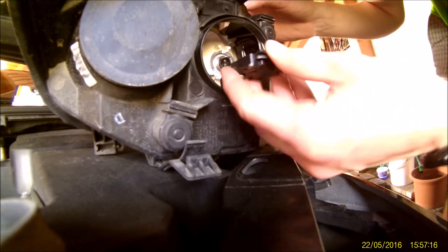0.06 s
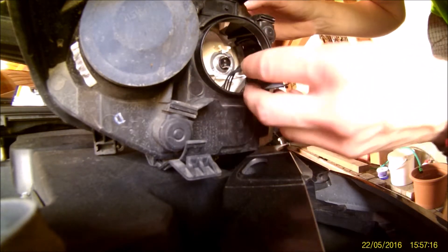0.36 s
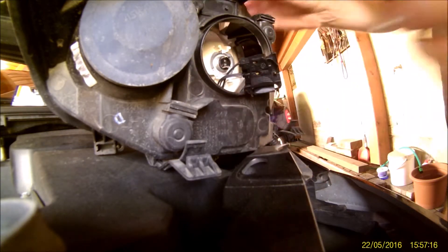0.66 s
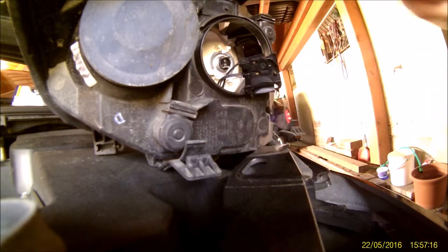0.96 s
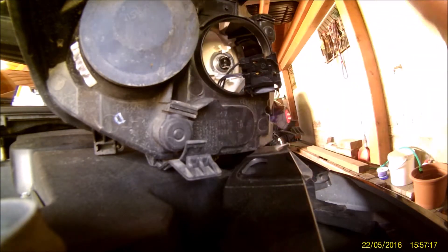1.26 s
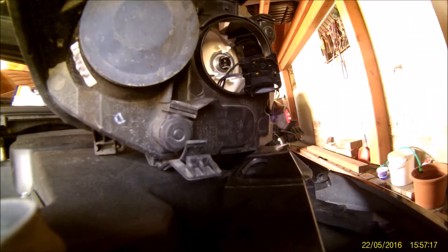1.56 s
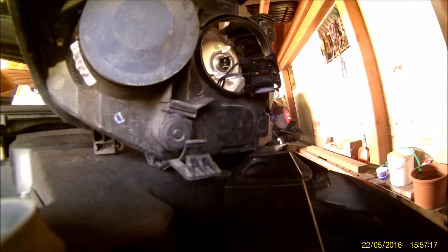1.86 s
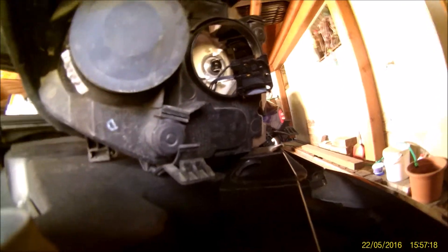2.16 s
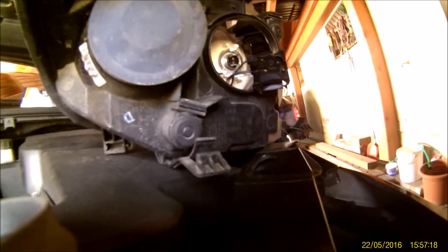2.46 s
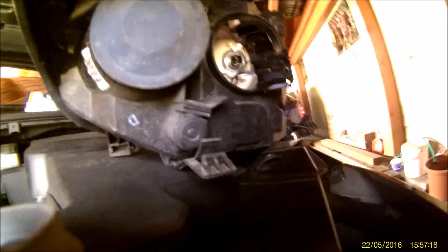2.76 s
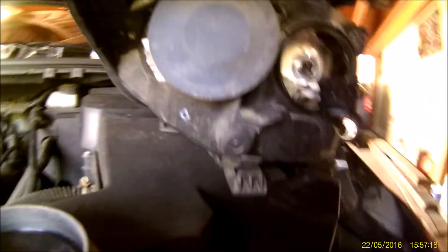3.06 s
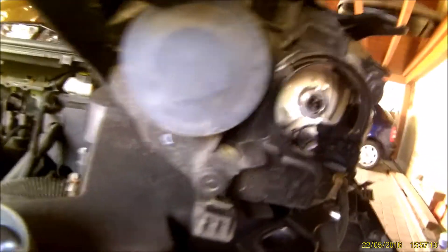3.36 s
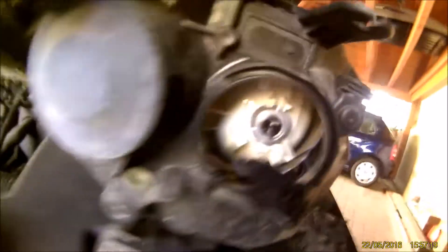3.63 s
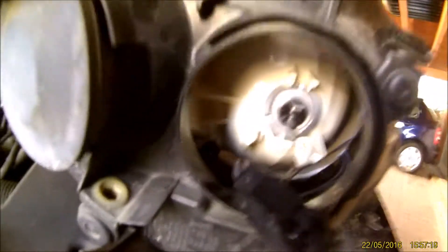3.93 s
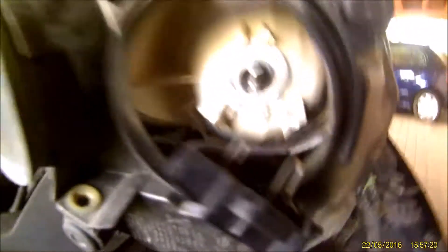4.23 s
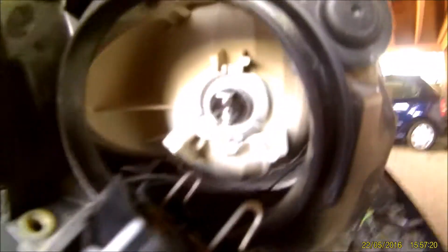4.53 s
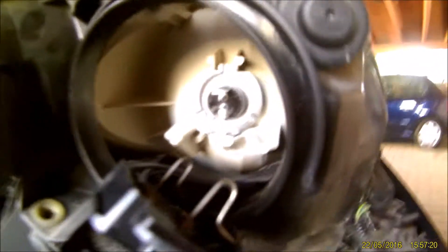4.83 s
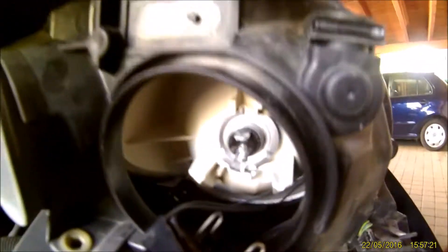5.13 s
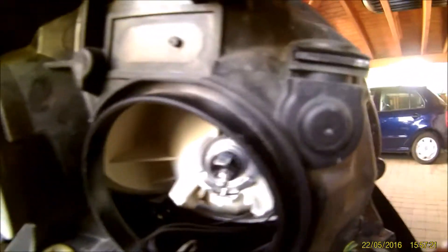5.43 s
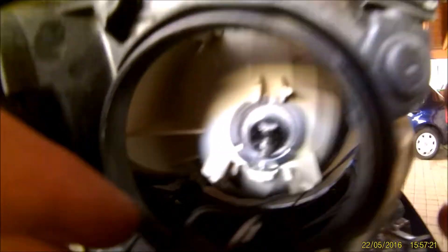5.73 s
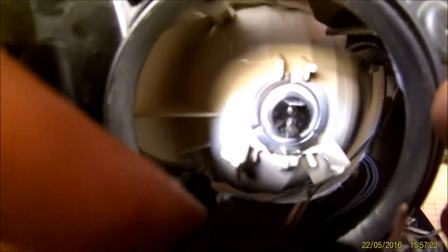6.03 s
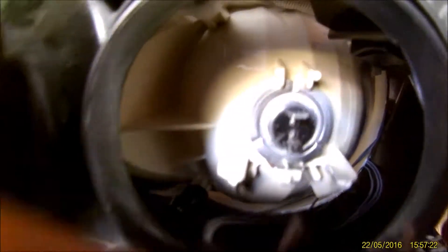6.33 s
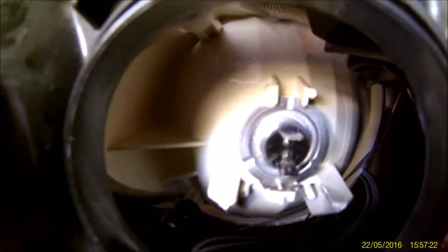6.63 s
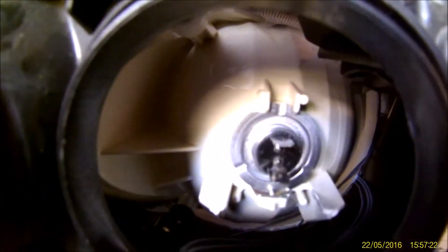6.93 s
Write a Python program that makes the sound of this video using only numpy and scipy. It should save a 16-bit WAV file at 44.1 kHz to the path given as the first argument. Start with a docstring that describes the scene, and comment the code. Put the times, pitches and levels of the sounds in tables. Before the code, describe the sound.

A small camera's faint hiss and thin, high whine run throughout in a quiet garage, with a slight high sizzle during the first second. After a tiny opening tick, a plug knocks lightly on a car headlamp's hollow plastic housing at about 0.2 and 0.4 seconds, scraping briefly into the second knock. From 1.6 seconds, fingers tap and rub the camera's case, right at the microphone. At about 2.1 and 2.3 seconds, the case gives very loud, sharp clacks that overload the microphone, with dull bumps underneath. More taps come around 2.5 seconds, then soft, dry finger strokes and light ticks continue until about 4 seconds. The hiss is left alone until a short plastic knock near 5 seconds. A faint hollow knock follows at 6.2 seconds and a slightly stronger one at 6.6.

```python
"""First comes a small camera's own hiss and thin whine, with a faint high sizzle and a light tick.
In a quiet garage, a hand knocks a plug and its leads against a car headlamp's hollow plastic housing.
Then the camera is picked up: fingers tap, bump and slide over its case, which flexes and clacks,
overloading the microphone. A few more hollow knocks follow, over the same hiss and whine."""
import sys
import numpy as np
from scipy import signal
from scipy.fft import rfft, irfft
from scipy.io import wavfile
from scipy.ndimage import uniform_filter1d

SR = 44100
rng = np.random.default_rng(int(sys.argv[2]) if len(sys.argv) > 2 else 0)


def dump_mix(stems):
    """Bounce the given channels to the path in sys.argv[1] as a 16-bit WAV at rate SR."""
    frames = np.atleast_2d(stems).T  # one column per channel
    limited = np.clip(frames, -1, 1)  # hard clip at full scale
    pcm = np.round(limited * 32767).astype(np.int16)
    wavfile.write(sys.argv[1], SR, pcm)


N = 308259
TIME = np.arange(N) / SR


def amp(db):
    """Turns decibels into a gain."""
    return 10 ** (np.asarray(db) / 20)

def unit_rms(x):
    """Scales a sound to an average power of 1."""
    return x / np.sqrt(np.mean(x ** 2) + 1e-20)

def unit_peak(x):
    """Scales a sound to a peak of 1."""
    return x / (np.max(abs(x)) + 1e-12)

def db_at(curve, hz):
    """Reads a tone curve's level at any frequency."""
    curve_hz, db = np.transpose(curve)
    return np.interp(np.log(hz + 1), np.log(curve_hz + 1), db)

def add(mix, start, sound):
    """Mixes a sound in at a start time in seconds."""
    part = mix[max(round(start * SR), 0):][:len(sound)]
    part += sound[:len(part)]

def colour(x, curve, size=4096):
    """Filters a sound by a tone curve, with no ringing ahead of a hit."""
    log_gain = np.log(amp(db_at(curve, abs(np.fft.fftfreq(size, 1 / SR)))))
    taps = np.fft.ifft(np.exp(np.conj(signal.hilbert(log_gain)))).real
    return signal.oaconvolve(x, taps[:size // 2])[:len(x)]

def resonate(x, hz, width_hz):
    """Lets through a band of frequencies around hz."""
    r = np.exp(-np.pi * width_hz / SR)
    feedback = [1, -2 * r * np.cos(2 * np.pi * hz / SR), r * r]
    return signal.lfilter(np.array([1, 0, -1]) * (1 - r * r) / 2, feedback, x)

def fade(t, t60):
    """Falls by 60 dB in t60 seconds: the "fade time" in the tables."""
    return np.exp(-np.log(1000) * t / t60)

def tone(t, hz, t60):
    """One fading vibration."""
    return np.sin(2 * np.pi * hz * t) * fade(t, t60)

def ring(modes, t, stretch=1):
    """A struck object's tones; neighbours swing opposite ways. Stretch scales their fade times."""
    return sum((-1) ** k * amp(db) * tone(t, hz, t60 * stretch) for k, (hz, db, t60) in enumerate(modes))

def swell(t, rise, fall, shape):
    """A rounded peak at t = 0, 10 dB down one rise before and one fall after."""
    return amp(-10 * abs(t / np.where(t < 0, rise, fall)) ** shape)

def reflections(x, db, t60, top_hz):
    """Adds a dense tail of echoes, duller above top_hz."""
    t, r = np.arange(SR // 3) / SR, np.exp(-2 * np.pi * top_hz / SR)
    dull_noise = signal.lfilter([1 - r], [1, -r], rng.standard_normal(len(t)))
    tail = dull_noise * fade(t, t60) * (1 - np.exp(-t / 0.00205))
    return x + amp(db) * signal.oaconvolve(x, tail / np.linalg.norm(tail))[:len(x)]


# Tone curve of the hiss: (frequency [Hz], relative level [dB])
HISS_CURVE = [(12, -37), (20, -3), (140, -4.5), (298, -10.5), (362, -10), (465, -11.5), (519, -12.5),
              (1230, -15.5), (1500, -17.5), (1980, -18), (6720, -26), (9930, -29), (15500, -31.5)]
# A whine chopped about 76 times a second makes close tones: (pitch [Hz], level before boost [dB])
WHINE_TONES = [(9829, -91), (9905.5, -87), (9982, -75.5), (10058.3, -76.5), (10134.5, -89)]

def electronics(hiss_db=-53.5, whine_boost_db=1.0):
    """The camera's own steady hiss and thin whine."""
    gains = amp(db_at(HISS_CURVE, np.fft.rfftfreq(N, 1 / SR)))
    hiss = unit_rms(irfft(rfft(rng.standard_normal(N)) * gains, N))
    whine = sum(amp(db) * np.sin(2 * np.pi * (hz * TIME + rng.random())) for hz, db in WHINE_TONES)
    return amp(hiss_db) * hiss + amp(whine_boost_db) * np.sqrt(2) * whine


# How loud the sizzle is: (time [s], level [dB])
SIZZLE_LEVELS = [(0, -67.5), (0.45, -68.5), (1.05, -65), (1.1, -90)]

def sizzle(hz=10000, width_hz=2800):
    """A faint band of high noise that stops after about a second."""
    band = resonate(resonate(rng.standard_normal(N), hz, width_hz), hz, width_hz)
    return unit_rms(band) * amp(np.interp(TIME, *np.transpose(SIZZLE_LEVELS), right=-np.inf))


def flex(t, hz, t60, contact_cycles=0.16):
    """The stiff camera case swings a few times; the force builds over part of a cycle."""
    return (1 - np.exp(-(hz * t / contact_cycles) ** 2)) * tone(t, hz, t60)


# Tone curve of a sharp crack: (frequency [Hz], relative level [dB])
CRACK_CURVE = [(200, 2.5), (1000, 0), (2600, 2), (3300, -2.5), (4800, 2), (6000, -3), (7000, -8),
               (10000, -12), (13000, -35), (15500, -16)]

def crack(t):
    """A sharp contact: one click, then a brief splintering noise."""
    splinters = 0.38 * rng.standard_normal(len(t)) * fade(t, t60=0.0046)
    return unit_peak(colour((t == 0) + splinters, CRACK_CURVE))


# Tones of the panel: (pitch [Hz], relative level [dB], fade time [s])
PANEL_TONES = [(261, -2.5, 0.059), (341, -4.5, 0.038), (420, -6.5, 0.023), (520, -16, 0.061),
               (710, -7.5, 0.046), (844, -6.5, 0.03), (930, 4.5, 0.014), (1092, -15.5, 0.065),
               (1275, 1, .012), (1650, 1.5, 0.014), (2390, -0.5, 0.011)]

def panel(t):
    """The panel that the camera stands on rings briefly."""
    return unit_peak(ring(PANEL_TONES, t))


# Finger taps on the case: (time [s], level [dB], pitch [Hz])
FINGER_TICKS = [(0.021, -34, 9100), (1.6217, -41.5, 3630), (1.6441, -26, 1130), (1.8695, -33, 1500),
                (2.086, -40, 3000), (2.4696, -17, 980), (2.532, -9.5, 1650), (2.5414, -23, 1800),
                (2.5885, -12, 1200), (2.859, -29, 1300), (3.173, -25.5, 1400), (3.6717, -28.5, 1590),
                (3.6865, -28, 776), (3.7544, -26.5, 1400), (3.9298, -29.5, 1760)]

def ticks(fade_cycles=8.4, panel_db=-22.5):
    """Light touches flex the case and barely stir the panel."""
    out, t = np.zeros(N), np.arange(SR // 5) / SR
    panel_ring = amp(panel_db) * panel(t)
    for start, db, hz in FINGER_TICKS:
        crack_db = min(-15 + 25 * np.log2(hz / 1400), 0)  # a harder touch sounds higher and cracks more
        add(out, start, amp(db) * (flex(t, hz, fade_cycles / hz) + amp(crack_db) * crack(t) + panel_ring))
    return reflections(out, db=-23, t60=0.04, top_hz=3000)


# Tones of the lamp housing: (pitch [Hz], relative level [dB], fade time before stretch [s])
HOUSING_TONES = [(282, -0.5, 0.13), (427, 1, 0.064), (464, -9, 0.2), (514, -4.5, 0.087), (635, -10, 0.12),
                 (778, -1.5, 0.079), (993, -13.5, 0.11), (1060, -14.5, 0.071), (1150, -9, 0.048),
                 (1212, -9.5, 0.071), (1350, -7.5, 0.091), (1540, -7, 0.043), (1980, -21.5, 0.11)]
# Knocks of the plug: (time [s], level [dB], main swing pitch [Hz], swing against ring [dB],
# swing fade time [s], contact tick against knock [dB])
PLUG_KNOCKS = [(0.166, -31, 706, -4, 0.042, -21), (0.3724, -22.5, 795, -3, 0.014, -21),
               (4.9735, -22, 980, 18, 0.014, -11), (6.2325, -43, 746, -4.5, .033, -30),
               (6.2431, -37.5, 476, -4, 0.051, -25), (6.5625, -29, 789, 0, 0.085, -26),
               (6.5652, -31, 292, 4, 0.053, -18)]

def lamp_housing():
    """Each knock sets off one main swing and a hollow ring; the sliding plug stirs the same tones."""
    out, t = np.zeros(N), np.arange(SR // 4) / SR
    body = unit_peak(resonate(ring(HOUSING_TONES, t, stretch=0.62), hz=850, width_hz=1100))
    for start, db, hz, swing_db, t60, tick_db in PLUG_KNOCKS:
        swing = amp(swing_db) * tone(t, hz, t60)
        burst = rng.standard_normal(len(t)) * fade(t, t60=0.035)
        tick = amp(tick_db) * unit_peak(colour(burst, CRACK_CURVE))
        add(out, start, amp(db) * (unit_peak(body - swing) + tick))
    # The plug slides along the housing into the second knock.
    rubbed = signal.oaconvolve(rng.standard_normal(N), ring(HOUSING_TONES, t, stretch=0.34))[:N]
    scrape = unit_rms(resonate(rubbed, hz=960, width_hz=370))
    out += amp(-40) * scrape * swell(TIME - 0.3655, rise=0.036, fall=0.01, shape=1.3)
    return reflections(out, db=-9.5, t60=0.12, top_hz=4000)


def skin_slips(size, per_second=2200, spread_db=2.6, noise_share=0.72, grip_db=1.66):
    """Skin moves in tiny jerks, stronger and weaker as the grip catches and lets go."""
    slipping = rng.random(size) < per_second / SR
    strength = amp(spread_db * np.minimum(rng.exponential(1, size), 3))
    grip = unit_rms(uniform_filter1d(rng.standard_normal(size), size=260))
    jerks = unit_rms(slipping * strength * rng.choice([-1, 1], size))
    return (jerks + noise_share * rng.standard_normal(size)) * amp(grip_db * grip)


# Tone curve of rubbing heard through the case: (frequency [Hz], relative level [dB])
CASE_CURVE = [(100, -11.5), (620, -8.5), (920, 1.5), (1650, -2.5), (2200, -5), (2550, -2.5), (3400, -14),
              (4300, -9.5), (5200, -15), (6200, -19.5), (7000, -21.5), (11000, -22), (13400, -29),
              (15300, -28.5)]
# How loud the palm is: (time [s], level [dB])
PALM_LEVELS = [(1.6, -56), (1.86, -59.5), (1.875, -47), (2.06, -53.5), (2.29, -58.5), (2.628, -61),
               (2.64, -46.5), (3.06, -60), (3.45, -50), (3.72, -63)]

def palm():
    """The holding hand shifts and rubs faintly on the case."""
    level_db = np.interp(TIME, *np.transpose(PALM_LEVELS), left=-np.inf, right=-np.inf)
    return unit_rms(colour(skin_slips(N), CASE_CURVE)) * amp(level_db)


# Bands of the rasp: (multiple of its pitch [ratio], width [Hz], relative level [dB])
RASP_BANDS = [(.4, 350, 4.5), (1, 764, 3), (1.41, 650, -4), (1.78, 750, -10), (3.06, 1300, -14)]

def rasp(size, pitch):
    """A dry fingertip's jerks ring in a few broad bands."""
    slips = skin_slips(size)
    return unit_rms(sum(amp(db) * resonate(resonate(slips, ratio * pitch, width), ratio * pitch, width)
                        for ratio, width, db in RASP_BANDS))


# Finger strokes: (peak time [s], length [s], level [dB], brightness [dB per octave], rasp pitch [Hz])
FINGER_STROKES = [(1.952, 0.049, -40.5, -1, 5100), (2.018, 0.11, -45, 0.5, 4500),
                  (2.231, 0.13, -55, -2.5, 4430), (2.312, 0.01, -47.5, 3.5, 4270),
                  (2.345, 0.065, -46, 2.5, 4370), (2.422, 0.074, -45.5, 2.5, 4600),
                  (2.518, 0.043, -42.5, -3, 4360), (2.576, 0.07, -35.5, -1, 4300),
                  (2.731, .16, -39, -2, 4690), (2.841, .09, -44.5, -3.5, 4600),
                  (2.932, 0.21, -43.5, 2.5, 4920), (3.091, 0.016, -39, -1.5, 4500),
                  (3.18, 0.044, -37, -1.3, 4560), (3.266, 0.047, -38.5, -3.3, 4500),
                  (3.387, 0.04, -38.5, -0.5, 4700), (3.493, 0.015, -33.5, -2.5, 4960),
                  (3.516, 0.096, -33, -1.2, 5170), (3.581, 0.039, -38.5, 2, 5070),
                  (3.675, .03, -38.5, -2, 4750), (3.804, 0.04, -41, 2.5, 4330),
                  (3.946, 0.02, -38.5, 1, 5080), (3.987, 0.12, -47.5, 1.5, 4880)]

def strokes(rise_share=0.53, hollow_ratio=0.33, hollow_octaves=0.29):
    """Fingers rub the case, heard through the hollow under the hand; drier skin is brighter and raspier."""
    out, size = np.zeros(N), 32768
    t, hz = (np.arange(size) - size // 2) / SR, np.fft.rfftfreq(size, 1 / SR)
    octaves = np.log2(np.clip(hz, 800, 8000) / 800)  # brightness tilts the range from 800 to 8000 Hz
    for peak_time, length, db, brightness, pitch in FINGER_STROKES:
        hollow_db = 4 * np.exp(-(np.log2((hz + 1) / (hollow_ratio * pitch)) / hollow_octaves) ** 2)
        gains = amp(db_at(CASE_CURVE, hz) + brightness * octaves + hollow_db)
        rub = unit_rms(irfft(rfft(skin_slips(size)) * gains))
        pressure = swell(t, rise_share * length, (1 - rise_share) * length, shape=2.18)
        rasp_gain = amp(-6.5 + 1.7 * brightness) * pressure ** 2.2  # most when pressed hardest
        add(out, peak_time + t[0], amp(db) * (pressure * rub + rasp_gain * rasp(size, pitch)))
    return out


# Dull bumps through the case, and the panel's low ring after hits: (time [s], level [dB], pitch [Hz], fade time
# [s])
LOW_THUDS = [(1.944, -39.5, 44.8, 0.23), (2.1360, -34, 56.4, .08), (2.1401, -24, 258, 0.0294),
             (2.3204, -27, 67.4, 0.1), (2.579, -19.5, 265, 0.015), (2.581, -37, 111, 0.13),
             (3.7620, -34.5, 64, 0.17)]

def bumps():
    """Soft pushes of the hand make short, low thuds; the rows near 260 Hz are the panel's deepest tone ringing
    on after a clack or tap."""
    out, t = np.zeros(N), np.arange(SR // 4) / SR
    for start, db, hz, t60 in LOW_THUDS:
        add(out, start, amp(db) * tone(t, hz, t60))
    return out


# Tones of the snapping case: (multiple of its pitch [ratio], relative level [dB], fade time [s])
SNAP_TONES = [(.62, -3, 0.0068), (1, -1.5, 0.0059), (1.16, -4, .004), (1.42, -7, 0.0048), (2.4, -5, 0.0026),
              (3.76, -14.5, .003)]
# Hard clacks: (time [s], push level [dB], push pitch [Hz], panel against push [dB],
# wait for the snap [s], snap level [dB], snap pitch [Hz])
CASE_CLACKS = [(2.1079, -6, 1000, -4.5, 0.00014, -15, 3660), (2.1343, 6, 960, -13.5, 0.002, 7.5, 4210),
               (2.3229, 0.5, 798, -23, 0.00039, 14, 2700)]

def clacks(crack_db=-5.5):
    """A push flexes the case, which then snaps and sets the panel under it ringing."""
    out, t = np.zeros(N), np.arange(SR // 5) / SR
    for start, push_db, push_hz, panel_db, wait, snap_db, snap_hz in CASE_CLACKS:
        add(out, start, amp(push_db) * flex(t, push_hz, t60=0.0064))
        snap = unit_peak(sum(amp(db) * flex(t, ratio * snap_hz, t60) for ratio, db, t60 in SNAP_TONES))
        snap += amp(crack_db) * crack(t)
        add(out, start + wait, amp(snap_db) * snap + amp(push_db + panel_db) * panel(t))
    return reflections(out, db=-36, t60=0.063, top_hz=2000)


def scene():
    """All the sounds meet at one microphone."""
    return (lamp_housing() + clacks() + ticks() + bumps() + strokes() + palm() + sizzle() + electronics())[None]

def record(dry, clip_level=0.95, top_hz=15850):
    """The hardest clacks overload the microphone and clip; then the highest treble is cut."""
    clipped = np.clip(dry, -clip_level, clip_level)
    low_pass = signal.firwin(511, top_hz, window=("kaiser", 9), fs=SR)
    return signal.oaconvolve(clipped, low_pass[None], "same")


dry = scene()
out = record(dry)
dump_mix(out)
```